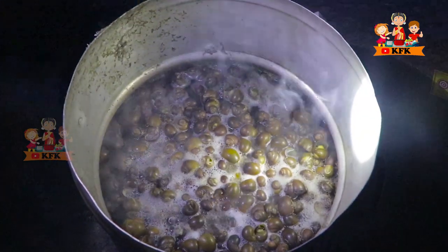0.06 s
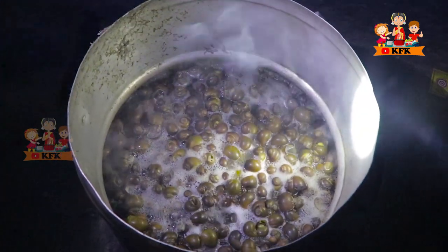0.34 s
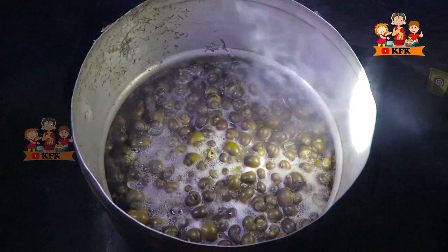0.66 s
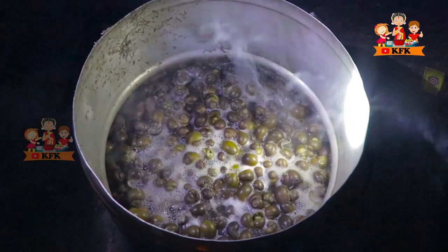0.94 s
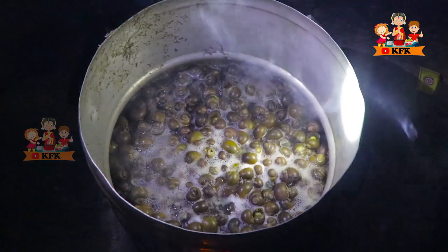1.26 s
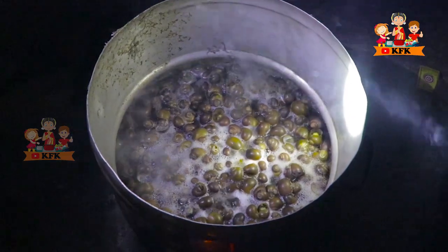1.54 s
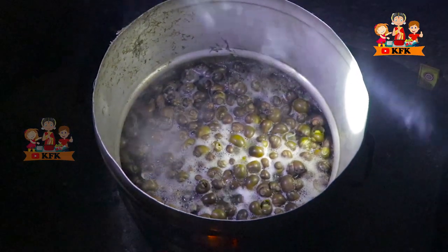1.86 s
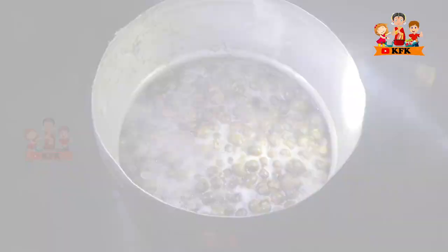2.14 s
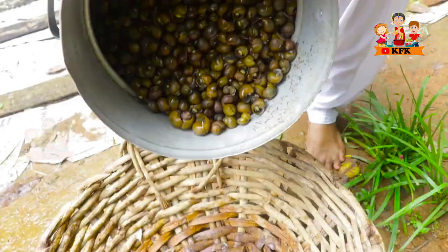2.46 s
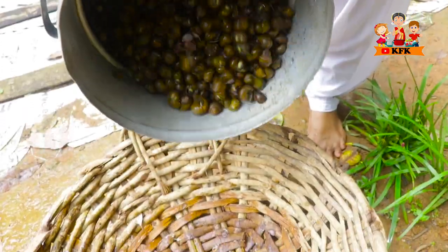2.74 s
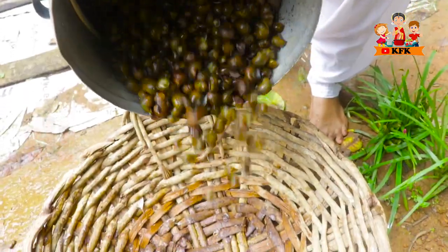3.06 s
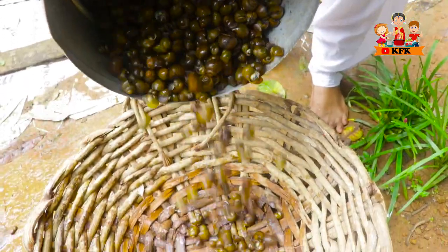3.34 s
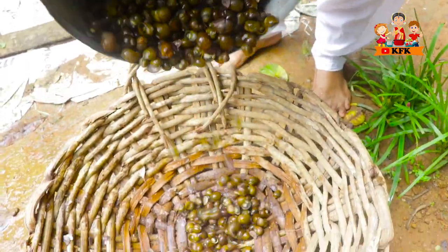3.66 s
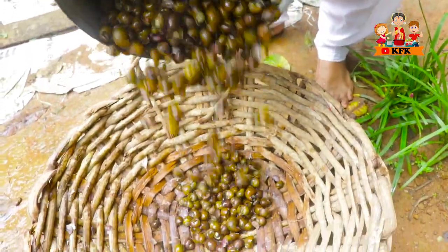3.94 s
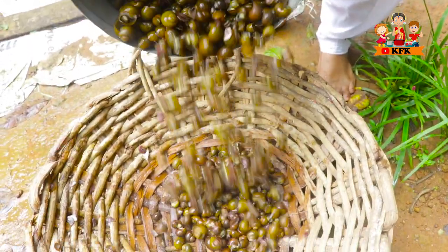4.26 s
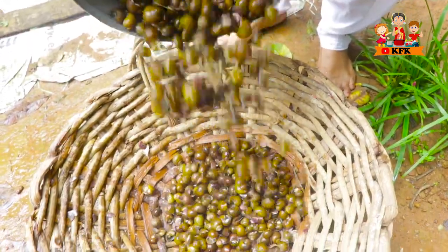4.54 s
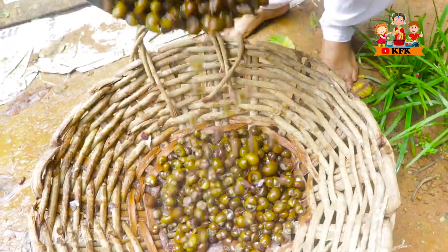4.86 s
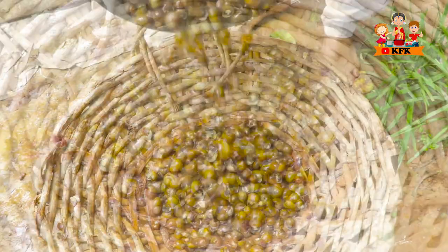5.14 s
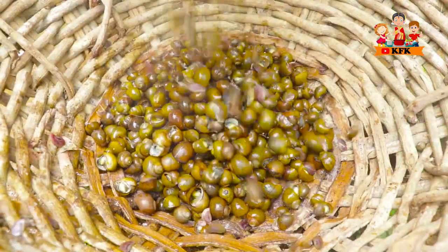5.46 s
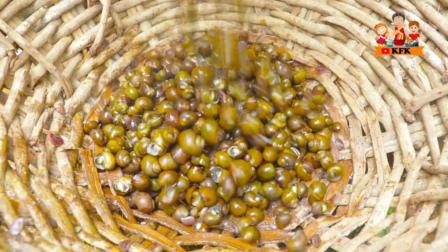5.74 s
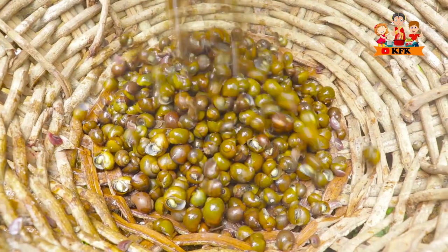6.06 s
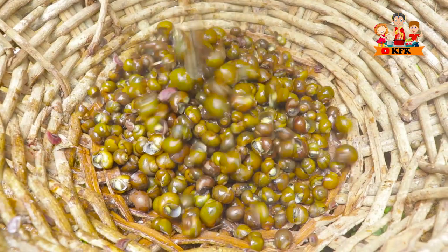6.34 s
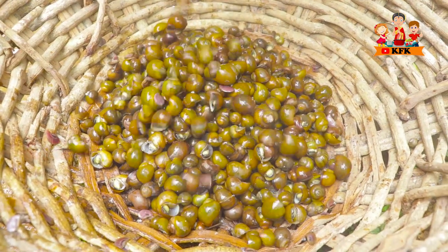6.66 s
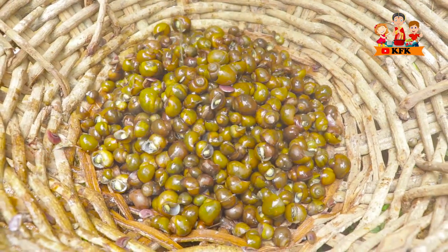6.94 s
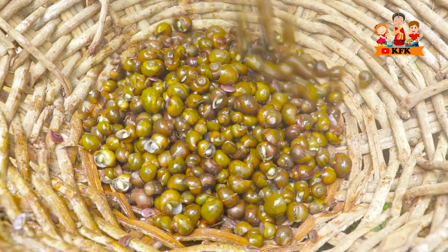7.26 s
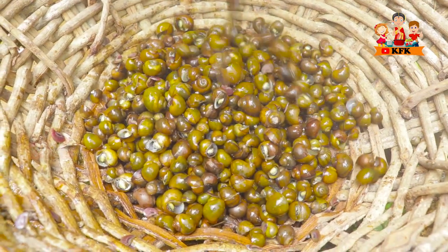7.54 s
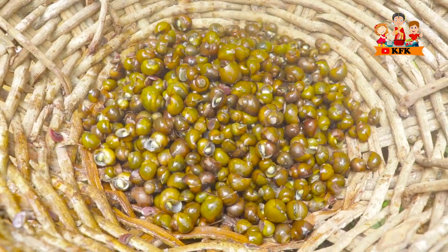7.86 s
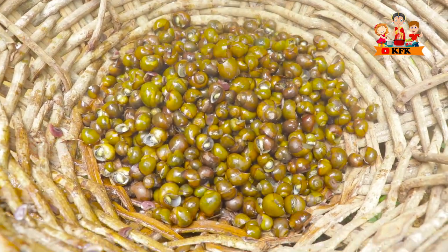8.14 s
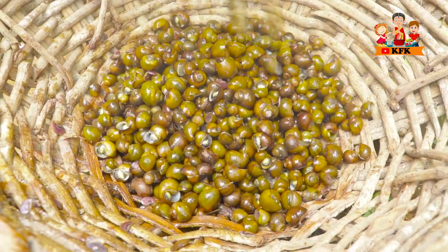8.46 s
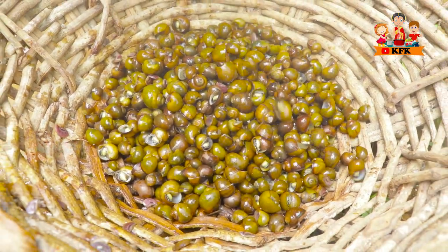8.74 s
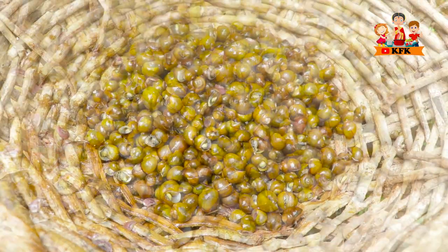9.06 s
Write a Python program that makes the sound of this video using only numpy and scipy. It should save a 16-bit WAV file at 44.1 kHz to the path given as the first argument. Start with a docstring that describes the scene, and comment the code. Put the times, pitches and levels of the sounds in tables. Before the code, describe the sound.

Snails bubble in a ringing metal pot, then wet shells slide out and clatter into a wicker basket outdoors.

```python
"""Snails simmer in a big metal pot: dense bubbles keep the pot ringing over the burner's low hum.
At about 2.4 s the boil gives way to a brief low drone and the outdoors, where insects shrill behind.
The pot is tipped over a woven basket: the load slips with a bright rasp, then wet shells grind over
the metal in surges, thud on the wicker and click on the growing heap. The emptying pot rings more
freely, and the last few shells drop singly."""
import sys
import numpy as np
from scipy import signal
from scipy.io import wavfile
from scipy.ndimage import uniform_filter1d

SR = 44100
rng = np.random.default_rng(int(sys.argv[2]) if len(sys.argv) > 2 else 0)


def output_pcm(signal):
    """Save a mono or channel-first signal as 16-bit PCM at the path in sys.argv[1].

    Samples are clipped to [-1, 1] before scaling.
    """
    pcm = np.clip(np.atleast_2d(signal).T, -1, 1) * 32767
    wavfile.write(sys.argv[1], SR, np.round(pcm).astype(np.int16))


N = 405279

# EQ of the air bed: f/Hz, gain/dB
AIR_EQ = [(25, -27), (200, -10), (700, -13), (3500, -22), (6200, -14.5), (9000, -22), (16000, -33)]
# shrill insect bands: f/Hz, width/Hz, relative level/dB
INSECT_BANDS = [(4716, 16, -66), (5012, 16, -71), (7450, 330, -55)]
# the insects fade in as we move outdoors: t/s, linear gain
INSECT_FADE = [(2.25, 0), (2.55, 0.73)]
# a low tone sags and recovers: t/s, f/Hz, level/dB
DRONE_TONE = [(2.22, 190, -70), (2.3, 175.5, -59), (2.43, 160.6, -52), (2.61, 160.5, -50.5),
              (2.83, 172.6, -67), (2.92, 180, -77)]
# a faint far tone rises: t/s, f/Hz, level/dB
FAR_TONE = [(7.25, 455, -66), (7.29, 470, -51), (7.34, 513, -52), (7.385, 575, -54), (7.45, 555, -62)]

# burner and pot hum together: f/Hz, level/dB at the height of the boil
BURNER_PARTIALS = [(102, -70), (414, -52), (614, -57), (712, -55), (828, -55)]
# the main hum comes and goes: t/s, f/Hz, level/dB
MAIN_HUM = [(0, 204, -72), (0.66, 204.2, -61), (0.74, 203, -50), (0.83, 205, -74), (0.94, 207.4, -50),
            (1.26, 204, -51), (1.35, 206.5, -81), (1.5, 201, -58), (2.28, 202.7, -60.5)]
# envelope of the boil: t/s, relative level/dB
BOIL_LEVEL = [(0, -32.3), (0.7, -31), (2.26, -32), (2.34, -38), (2.42, -53), (2.56, -57)]
# EQ of the bubbling water: f/Hz, gain/dB
BOIL_EQ = [(59, -61), (100, -42), (202, -10.5), (255, -16), (315, -10), (558, -10), (705, -8), (752, -8.5),
           (1150, -4), (2520, -2.5), (4670, -16.5), (6020, -12.5), (6560, -18), (11200, -25),
           (16000, -35.5)]
# modes of the full pot: f/Hz, width/Hz, relative gain/dB
FULL_POT_MODES = [(321, 16, 11), (516, 12, 12), (614, 8, 12), (712, 9, 15), (828, 9, 15), (937, 14, 6),
                  (1034, 18, 9), (1185, 16, 12), (1346, 14, 9), (1464, 26, 10), (1583, 30, 10),
                  (1923, 16, 8), (2030, 14, 4), (2184, 22, 5), (2478, 15, 7), (3600, 270, 0),
                  (5880, 110, 3), (6040, 150, 2)]
# water wells up between the shells after a short lull: t/s, boost/dB, bubble f/Hz
UPWELLINGS = [(0.01, 4.5, 1560), (0.115, 2.5, 2100), (0.26, 1, 1100), (0.595, 4, 1400), (0.85, 0, 1450),
              (1.575, 3.5, 1500), (1.82, 2, 1542)]
# one pot mode firms into a clear tone as the boil goes on: t/s, f/Hz, level/dB
SINGING_MODE = [(0.5, 2478, -60), (1.0, 2478, -49), (1.85, 2478, -47), (2.1, 2478, -60)]

# the steady stream over the rim, in relative levels: t/s, landing level/dB, sliding level/dB
STEADY_FLOW = [(2.5, -62.5, -63), (2.59, -44, -38), (2.76, -41.5, -33.5), (2.89, -42.5, -36.5),
               (4.91, -42, -36), (5.53, -40.5, -36), (6.29, -39, -39), (6.58, -40, -41), (6.78, -81, -44.5),
               (6.99, -63, -27), (7.13, -42.5, -34), (7.48, -36.5, -35.5), (7.72, -54, -61.5),
               (7.96, -77.5, -37.5), (8.1, -69, -48), (8.33, -57, -36), (8.52, -48, -44),
               (8.62, -54.5, -51.5), (8.83, -65.5, -50.5), (9.15, -86, -70)]
# shells jam at the rim, then rush out, in relative levels:
# crest t/s, rise/s, hold/s, jam dip/dB, sliding level/dB, landing level/dB, wicker level/dB
RIM_SURGES = [(3.016, .02, 0.049, 3.5, -39, -40, -67), (3.266, .01, 0.11, 0.5, -31.5, -65, -65),
              (3.397, 0.0099, 0.13, -6, -32, -40, -56), (3.581, .005, 0.016, 5, -31.5, -36, -54),
              (3.777, 0.17, 0.063, -4, -26.5, -40.5, -48), (3.941, 0.004, 0.057, 7.5, -25.5, -36.5, -48),
              (4.144, 0.039, 0.032, 2.5, -25, -36, -52), (4.334, 0.052, 0.024, 2, -31.5, -33.5, -76),
              (4.51, 0.26, 0.069, 6.5, -31.5, -38, -53), (4.723, 0.008, 0.0083, 1, -31, -32.5, -69),
              (4.785, 0.026, 0.021, 6, -52, -37.5, -65), (5.142, 0.0056, 0.0047, -9, -19.5, -30, -61),
              (5.207, .02, 0.018, 5, -31, -32.5, -41.5), (5.835, .015, 0.036, -1.5, -32, -46, -68),
              (6.655, 0.019, 0.05, 1, -38.5, -41, -76), (6.789, 0.009, 0.0065, -2, -36.5, -41.5, -70),
              (6.972, 0.082, 0.069, 20, -24, -39.5, -49), (7.07, 0.016, 0.19, 0, -29, -44, -50),
              (7.286, 0.018, 0.041, 13, -37, -36.5, -50.5), (7.498, 0.05, 0.09, 6, -41.5, -41, -56),
              (7.908, 0.0095, 0.005, 1, -33.5, -49, -60), (7.946, 0.0062, 0.007, 2, -32.5, -45, -65),
              (8.074, 0.053, 0.023, 20, -26, -41, -53.5), (8.138, 0.022, 0.034, 0, -30.5, -43.5, -50.5),
              (8.237, 0.043, 0.014, 15, -28, -42, -47), (8.407, 0.0033, 0.0046, 9.5, -34, -33, -44)]
# the stream breaks off for a moment: t/s, depth/dB
STREAM_PAUSES = [(3.165, 3.5), (3.568, 7), (3.648, 17), (3.705, 4), (4.648, 8), (4.695, 3.5), (5.066, 17),
                 (5.172, 11), (6.225, 8), (6.84, 7), (8.213, 9.5), (8.618, 10)]
# a batch lands and the basket booms: t/s, hold/s, level/dB, f/Hz
BASKET_BOOMS = [(3.733, 0.068, -47.5, 298), (3.93, 0.057, -49, 288), (4.508, 0.066, -55, 293),
                (4.846, 0.015, -40.5, 794), (4.968, 0.0097, -51, 132), (5.147, 0.014, -45, 357),
                (6.941, .08, -54, 340), (7.22, 0.026, -55, 340), (8.807, 0.02, -57, 825)]
# EQ of the thuds on the wicker: f/Hz, gain/dB
WICKER_EQ = [(76, -49.5), (130, -16), (257, -20), (300, 0), (356, -6), (433, -5.5), (550, -4), (729, -8),
             (1000, 11.5), (1300, -27), (2200, -120)]
# the whole load first slips down the wet wall: t/s, relative level/dB
SLIP_LEVEL = [(2.6, -42), (2.726, -38), (2.794, -33.5), (2.885, -30), (2.94, -36.5), (3.1, -31.5),
              (3.135, -36), (3.3, -37.5)]
# bright modes of the pot wall during the slip: f/Hz, width/Hz, relative gain/dB
WALL_MODES = [(2990, 35, 12), (3620, 160, 0), (3700, 1900, -3), (4360, 80, 2), (4485, 70, 4),
              (5085, 45, 3.5)]
# EQ of shells sliding on metal: f/Hz, gain/dB
SLIDE_EQ = [(290, -76), (500, -23), (1220, -3), (1590, -3.5), (1820, -6), (2530, 2.5), (3130, 1),
            (5800, -10), (7000, -1), (9100, -33), (15400, -120)]
# modes of the tipped pot: f/Hz, width/Hz, loaded gain/dB, nearly empty gain/dB
TIPPED_POT_MODES = [(794, 14, 1, 9), (1230, 70, -7.5, 1), (1471, 50, 3.5, -9), (1880, 130, -9, 12),
                    (2090, 40, -12, 3), (2360, 50, -11, 2), (2730, 40, -10, -1), (3100, 110, -13, 6),
                    (3540, 70, 4, 2), (4350, 110, 2, 3), (4740, 50, -8, 5)]
# the load leaves the pot: t/s, share poured out
POURED_SHARE = [(4, 0.027), (5.5, 0.36), (7, 1)]
# EQ of shells landing on shells: f/Hz, gain/dB
HEAP_EQ = [(530, -39), (900, -32), (1090, -47), (1260, -22), (1390, -18), (2140, -7), (3000, -1.5),
           (4920, -4.5), (7400, -0.5), (10900, -5), (16000, -17.5)]
# single shells hit hard, in relative levels: t/s, click level/dB, shell f/Hz, knock level/dB
SHELL_HITS = [(2.63, -6.5, 9070, -35), (2.6454, -11, 5900, -29), (2.6546, -6, 6230, -33),
              (2.671, -15, 6450, -33), (2.6933, -7.5, 7500, -30), (2.8055, -7, 3160, -25),
              (2.8195, -9, 3760, -40), (2.873, -6.5, 4550, -29), (2.885, -8, 5200, -39),
              (2.904, -8, 4550, -48), (3.0579, -17, 2900, -39), (3.0707, -13, 3015, -45),
              (3.0906, -14, 3080, -46), (3.2382, -11, 2802, -25), (3.281, -13, 1990, -26),
              (3.291, -14, 2080, -22.5), (3.3134, -11.5, 3900, -30), (3.3317, -11, 2020, -23.5),
              (3.3832, -18, 3447, -23.5), (3.4202, -10, 7050, -29), (3.437, -15, 9100, -31),
              (3.491, -16.5, 3500, -24.5), (3.516, -17, 3367, -26), (3.5513, -9, 6300, -34),
              (3.6066, -17, 3700, -35), (3.6354, -15, 5300, -27), (3.656, -13, 3340, -31),
              (3.6658, -14, 5030, -39), (3.681, -9, 3800, -28), (3.717, -10.5, 3330, -25),
              (3.854, -12.5, 3670, -41), (3.8753, -15, 6780, -41), (3.9548, -11.5, 1980, -21),
              (3.9777, -4, 3220, -23), (4.0697, -14, 3160, -44), (4.0913, -15.5, 6300, -44),
              (4.1556, -16, 4450, -24), (4.2502, -9, 2340, -33), (4.457, -9.5, 7200, -44),
              (4.491, -11, 3640, -42), (4.6625, -16, 6040, -33), (4.7162, -11, 3020, -37),
              (4.851, -13, 7100, -26.5), (4.965, 0.5, 9100, -26.5), (5.007, -2, 10000, -30.5),
              (5.0462, -8, 4250, -36), (5.084, -4.5, 9700, -34), (5.112, -15, 2670, -37),
              (5.1512, -15, 3600, -26), (5.186, -15, 2724, -31), (5.227, -9, 2700, -33),
              (5.2647, -6, 7280, -34), (5.274, -6.5, 5900, -47), (5.297, -9, 8620, -51),
              (5.3336, -6, 5490, -49), (5.381, -10, 7560, -33), (5.4262, -11, 6850, -48),
              (5.4604, -10, 6560, -36), (5.4799, -8, 7380, -37), (5.5723, -8, 4200, -35),
              (5.613, -19, 2936, -28.5), (5.759, -10, 6210, -35), (5.932, -8.5, 2592, -53),
              (6.0427, -13, 7520, -47), (6.1378, -8, 3600, -39), (6.152, -15, 5000, -46),
              (6.187, -13, 6200, -34), (6.2028, -6, 3720, -30), (6.3093, -6, 10100, -41),
              (6.398, -10, 3300, -34), (6.5007, -8, 4080, -30.5), (6.5682, -10, 3170, -33),
              (6.6465, -9.5, 4020, -35), (6.6606, -9, 1540, -46), (6.7466, -11.5, 5200, -40.5),
              (6.7795, -18, 3630, -45), (6.8678, -19.5, 2380, -40), (6.9636, -8, 1900, -26),
              (7.08, -12, 3110, -38), (7.219, -9.5, 2697, -36), (7.291, -14, 2680, -36),
              (7.5743, -11.5, 9300, -43), (7.6139, -14, 2510, -48), (7.6747, -16, 8600, -38),
              (7.776, -30, 5450, -47), (7.7922, -11, 5400, -37), (8.253, -8, 2940, -24),
              (8.297, -14.5, 3200, -34.5), (8.4063, -11.5, 2410, -30), (8.4164, -5.5, 7570, -46),
              (8.435, -22, 10700, -52), (8.4526, -15, 10600, -44), (8.4747, -16, 2660, -49),
              (8.5322, -7.5, 6360, -37), (8.5695, -13.5, 5240, -42), (8.5817, -12, 6250, -33.5),
              (8.5856, -19, 7540, -45), (8.6418, -19, 7000, -46), (8.661, -14, 8200, -57),
              (8.7397, -23.5, 3000, -45), (8.8005, -16, 5470, -50), (8.8103, -16, 8600, -52),
              (8.844, -24, 4970, -53), (8.8896, -27, 7300, -56), (8.902, -30, 8500, -62),
              (8.922, -17.5, 6400, -51), (8.961, -31, 6940, -67)]


def from_db(db):
    """Decibels to linear gain."""
    return 10 ** (np.asarray(db) / 20)


def rms_one(x):
    """Normalise to an RMS of 1."""
    return x / np.sqrt(np.mean(x ** 2) + 1e-20)


def levelled(x, size=4000):
    """Slow gain riding toward level 1 that leaves transients intact."""
    power = uniform_filter1d(uniform_filter1d(np.mean(x, axis=0) ** 2, size), size // 2)
    return x / np.sqrt(np.abs(power) + 1e-3 * np.mean(x ** 2))


def automation(rows):
    """Each column of a breakpoint curve, sample by sample."""
    times, *columns = np.transpose(rows)
    return [np.interp(np.arange(N) / SR, times, column) for column in columns]


def gate(rows):
    """Open while a curve lasts, with 20 ms fades."""
    t = np.arange(N) / SR
    return uniform_filter1d(1. * ((t >= rows[0][0]) & (t <= rows[-1][0])), 900)


def bumps(t, times, heights_db, width_s):
    """Brief peaks in dB, for boosting or ducking a level."""
    return np.max([db / (1 + ((t - s) / width_s) ** 2) for s, db in zip(times, heights_db)], axis=0)


def drift(rate_hz):
    """Random LFO that glides between values of spread 1."""
    knots = rng.standard_normal(2000)
    return np.interp(np.arange(N) / SR * rate_hz, np.arange(len(knots)), knots)


def pan(left_db):
    """Left and right gains, left_db apart."""
    return from_db(np.array([left_db, -left_db]) / 2).reshape(2, -1)


def stereo_noise(width):
    """White noise with a share of side signal."""
    mid, side = rng.standard_normal((2, N))
    return mid + width * side * np.array([[1], [-1]])


def mono_bass(x, below_hz):
    """Roll the side signal off, so both ears hear the bass alike."""
    mid = x.mean(axis=0)
    return mid + signal.sosfilt(signal.butter(1, below_hz, "high", fs=SR, output="sos"), x - mid)


def band(x, low_hz, high_hz):
    """Butterworth band-pass."""
    sos = signal.butter(2, [low_hz, min(high_hz, SR * .45)], "band", fs=SR, output="sos")
    return signal.sosfilt(sos, x + 1e-18)


def equalised(x, curve, size=4096):
    """Minimum-phase EQ: no pre-ring ahead of a click."""
    hz, db = np.transpose(curve)
    grid_hz = np.abs(np.fft.fftfreq(size, 1 / SR)) + 1
    log_gain = np.log(from_db(np.interp(np.log(grid_hz), np.log(hz), db)))
    response = np.fft.ifft(np.exp(np.conj(signal.hilbert(log_gain)))).real
    return signal.oaconvolve(x, response[None, :size // 2], axes=1)[:, :N]


def resonance(x, hz, width_hz):
    """Two-pole resonator with unity gain at its peak."""
    r = np.exp(-np.pi * width_hz / SR)
    poles = [1, -2 * r * np.cos(2 * np.pi * hz / SR), r * r]
    return signal.lfilter(np.array([1, 0, -1]) * (1 - r * r) / 2, poles, x + 1e-18)


def ringing(x, modes):
    """The ring that a sound excites in a bank of modes."""
    return sum(from_db(db) * resonance(x, hz, width) for hz, width, db in modes)


def gliding_tone(rows, waver_db=2, wobble=.0025):
    """A sine that follows a pitch and level curve and wavers a little in both."""
    hz, db = automation(rows)
    phase = 2 * np.pi * np.cumsum(hz * (1 + wobble * drift(70))) / SR
    return np.sqrt(2) * from_db(db + waver_db * drift(40)) * np.sin(phase) * gate(rows)


def pings(hz, cycles, octaves, phase_spread, size, modes=3):
    """One short ring per contact: damped modes scattered round its pitch, phased apart at each ear."""
    draws = rng.standard_normal((len(hz), modes, 3)).astype(np.float32)
    t = np.arange(size, dtype=np.float32) / SR
    out = np.zeros((2, len(hz), size), np.float32)
    for detune, polarity, phase in draws.transpose(1, 2, 0)[..., None]:
        mode_hz = np.minimum(hz[:, None] * 2 ** (octaves * detune), SR * .45).astype(np.float32)
        age = t * mode_hz * float(2 * np.log(1000) / cycles)
        envelope = np.sign(polarity) * age * np.exp(-age)   # wet contacts build up softly
        for ear, sign in enumerate((1, -1)):
            out[ear] += envelope * np.sin(2 * np.pi * mode_hz * t + sign * phase_spread * phase)
    return out


def placed(times, grains):
    """Lay short stereo grains on the timeline."""
    at = (np.asarray(times) * SR).astype(int)[:, None] + np.arange(grains.shape[2])
    return np.array([np.bincount(at.ravel(), ear.ravel(), N)[:N] for ear in grains])


def shower(curve, low_hz, high_hz, count, cycles, accent_db, pan_db, phase_spread, size, octaves=.568):
    """A cloud of pings while a curve lasts, each with its own time, pitch, strength and pan."""
    when, pitch, accent, where = rng.random((count, 4)).T
    times = curve[0][0] + when * (curve[-1][0] - curve[0][0])
    hz = low_hz * (high_hz / low_hz) ** pitch
    strength = from_db(accent_db * np.minimum(-np.log(1 - accent), 3.3)) * np.sqrt(hz / low_hz)
    gains = strength * pan(pan_db * (2 * where - 1))
    return placed(times, pings(hz, cycles, octaves, phase_spread, size) * gains[..., None])


def crunch(grit, hz, width_hz, decay_s, crack=0):
    """An impact: a crack and a dying burst of tiny contacts in a resonance, at unit energy per ear."""
    age = np.arange(grit.shape[1]) / SR / decay_s
    burst = resonance(grit * np.exp(-age) + crack * (age == 0), hz, width_hz)
    return burst / np.sqrt(np.sum(burst ** 2) / 2)


def with_reflections(x, t60_s, wet_db, top_loss_db):
    """Pot, wicker and ground scatter each contact into a diffuse tail, built from five noise bands."""
    feedback = from_db(-120 / (t60_s * SR))
    edges = np.geomspace(250, 16000, 6)
    noise, mid, tail = rng.standard_normal((2, 2, N)), x.mean(axis=0), 0
    for k, (low, high) in enumerate(zip(edges, edges[1:])):
        power = signal.lfilter([1 - feedback], [1, -feedback], band(mid, low, high) ** 2)
        damping = from_db(-top_loss_db * (high / edges[-1]) ** 2)
        tail = tail + damping * np.sqrt(power) * rms_one(band(noise[k % 2], low, high))
    return x + from_db(wet_db) * tail


def air():
    """A quiet bed of air and low rumble throughout."""
    hiss = from_db(-63) * rms_one(equalised(stereo_noise(width=.5), AIR_EQ))
    rumble = from_db(-79 + 2 * drift(4.2)) * rms_one(resonance(stereo_noise(width=.39), 50, 70))
    return hiss + rumble


def insects():
    """Narrow noise bands shrill steadily once we are outdoors."""
    fade, = automation(INSECT_FADE)
    chorus = 0
    for hz, width, db in INSECT_BANDS:
        shrill = resonance(stereo_noise(width=.83), hz, 2 * width)
        chorus = chorus + from_db(db + 2.5) * rms_one(resonance(shrill, hz, 2 * width))
    return fade * chorus


def low_drone():
    """A low tone comes and goes in a dull rumble with a faint overtone."""
    _, level_db = automation(DRONE_TONE)
    noise = stereo_noise(width=.34)
    rumble = from_db(-1.5) * rms_one(band(noise, 45, 660))
    overtone = from_db(-4.5) * rms_one(resonance(noise, 308, 32))
    return gliding_tone(DRONE_TONE) + (rumble + overtone) * from_db(level_db) * gate(DRONE_TONE)


def burner():
    """The flame rumbles, and burner and pot hum together in wavering partials."""
    boil_db, = automation(BOIL_LEVEL)
    hum = 0
    for hz, db in BURNER_PARTIALS:
        gain = np.sqrt(2) * from_db(db + 3 * drift(24.64) + boil_db - boil_db.max())
        hum = hum + gain * np.sin(2 * np.pi * np.cumsum(hz * (1 + .00838 * drift(12))) / SR)
    flame = from_db(-69) * rms_one(band(stereo_noise(width=.42), 53, 180))
    return (hum + flame) * gate(BOIL_LEVEL) + gliding_tone(MAIN_HUM)


def boil(lull_lead_s=.073, welling_width_s=.011):
    """Bubbles burst between the shells over a seething wash and keep the pot ringing."""
    t = np.arange(N) / SR
    level_db, = automation(BOIL_LEVEL)
    bubbles = shower(BOIL_LEVEL, 245.5, 15170, count=1600, cycles=14.3, accent_db=-1.5,
                     pan_db=0, phase_spread=.18, size=400)
    wash = from_db(10.5) * stereo_noise(width=.83)
    water = mono_bass(equalised(levelled(bubbles) + wash, BOIL_EQ), below_hz=480)
    pot = levelled(water + from_db(-4.5) * ringing(water, FULL_POT_MODES))
    lull_db = bumps(t, [row[0] - lull_lead_s for row in UPWELLINGS], [2] * len(UPWELLINGS), welling_width_s)
    pot *= from_db(level_db + .8 + .5 * drift(23.86) - lull_db)
    pot += sum((from_db(bumps(t, [s], [db], welling_width_s)) - 1) * resonance(pot, hz, hz)
               for s, db, hz in UPWELLINGS)
    pot[1] = np.roll(pot[1], 4)   # the right ear hears it a little later
    return pot * pan(-1) * gate(BOIL_LEVEL) + gliding_tone(SINGING_MODE)


def stream_levels(jam_lead_s=.032, gap_lead_s=.005, surge_t60_s=.23, cushion_db_per_s=1.3):
    """Sliding, landing and wicker levels in dB: a steady flow of shells that jams and then surges."""
    t = np.arange(0, N, 20) / SR
    flow_s, *columns = np.transpose(STEADY_FLOW)
    landing_db, sliding_db = (np.interp(t, flow_s, column) for column in columns)
    wicker_db = sliding_db - 12 - cushion_db_per_s * (t - flow_s[0])   # the heap covers the wicker
    surge_s, _, _, dip_db, *_ = np.transpose(RIM_SURGES)
    jam_db = bumps(t, surge_s - jam_lead_s, dip_db, width_s=.093)
    power = from_db(np.array([sliding_db + .5, landing_db + 2.5, wicker_db]) - jam_db) ** 2
    for crest, rise, hold, _, *levels_db in RIM_SURGES:
        attack = np.clip(1 + (t - crest) / rise, 0, 1) ** 2
        release = from_db(-60 * np.clip((t - crest - hold) / surge_t60_s, 0, 2))
        power += (from_db(levels_db)[:, None] * attack * release) ** 2
    # a shell that hits hard falls through a short gap in the stream
    gap_db = bumps(t, [row[0] - gap_lead_s for row in SHELL_HITS], [6] * len(SHELL_HITS), width_s=.005)
    pause_db = bumps(t, *np.transpose(STREAM_PAUSES), width_s=.011)
    ducked_db = 10 * np.log10(power) - np.maximum(gap_db, pause_db)
    return automation(np.column_stack([t, *ducked_db]))


def basket_booms(width_hz=110, attack_s=.003, t60_s=.1):
    """Batches land one after another and set the hollow basket booming."""
    t, out = np.arange(N) / SR, 0
    pelting = stereo_noise(width=.2)
    for start, hold, db, hz in BASKET_BOOMS:
        release = from_db(-60 * np.clip((t - start - hold) / t60_s, 0, 2))
        push = np.clip((t - start) / attack_s, 0, 1) * release
        boom = resonance(resonance(push * pelting, hz, width_hz), hz, 2 * width_hz)
        out = out + from_db(db) * boom * np.sqrt(np.mean(push ** 2) / np.mean(boom ** 2))
    return out


def wicker_thuds(level_db):
    """Shells pelt the woven basket with dull, quickly damped thuds."""
    thuds = shower(STEADY_FLOW, 250, 1080, count=900, cycles=6.7, accent_db=.5,
                   pan_db=5, phase_spread=.1, size=600)
    return levelled(equalised(thuds, WICKER_EQ)) * from_db(level_db)


def wall_slip(grinding, ring_db_per_db=.8):
    """The load rasps down the wet wall; the harder it scrapes, the more of it is the wall's ring."""
    level_db, = automation(SLIP_LEVEL)
    ring = from_db(ring_db_per_db * (level_db - level_db.max())) * ringing(grinding, WALL_MODES)
    rasp = from_db(-6) * band(grinding, 2400, 6000)
    return levelled(ring + rasp) * from_db(level_db + 4 + 2 * drift(30)) * gate(SLIP_LEVEL)


def sliding_shells(level_db):
    """Shells slip and grind over the metal; the pot's ring changes as the load leaves it."""
    contacts = shower(STEADY_FLOW, 723, 4500, count=3600, cycles=9.5, accent_db=1,
                      pan_db=4.5, phase_spread=.045, size=220)
    grinding = (levelled(contacts) + from_db(7) * stereo_noise(width=.35)) * from_db(3.6 * drift(90))
    poured, = automation(POURED_SHARE)
    modes = [(hz, width, loaded_db + poured * (empty_db - loaded_db))
             for hz, width, loaded_db, empty_db in TIPPED_POT_MODES]
    scrape = equalised(grinding, SLIDE_EQ)
    return levelled(scrape + ringing(scrape, modes)) * from_db(level_db - .5) + wall_slip(grinding)


def heap_clicks(level_db, snaps_per_s=300, snap_decay_s=.003):
    """Shells land on shells in clumps: pitched clicks and sharp snaps, many small and few large."""
    thinning_db = np.clip(-.2 * (level_db + 44), 0, 4)   # a thin stream breaks up into single ticks
    clumps = from_db((1 + thinning_db) * drift(70))
    clicks = shower(STEADY_FLOW, 1800, 12000, count=3000, cycles=30, accent_db=1.6,
                    pan_db=9, phase_spread=.6, size=220, octaves=.4)
    landings = rng.random(N) < snaps_per_s / SR
    energy = landings * from_db(2.1 * np.minimum(rng.exponential(1, N), 4)) ** 2
    snap_power = signal.lfilter([1], [1, -np.exp(-2 / (snap_decay_s * SR))], energy + 1e-18)
    snaps = rms_one(np.sqrt(snap_power)) * stereo_noise(width=.88)
    clatter = clumps * (.61 * levelled(clicks) + snaps)
    return levelled(equalised(clatter, HEAP_EQ)) * from_db(level_db + 7.5)


def pour():
    """One stream of shells drives the clatter on the heap, the slide in the pot and the wicker thuds."""
    sliding_db, landing_db, wicker_db = stream_levels()
    heap = heap_clicks(landing_db) * pan(-4.5)
    slide = sliding_shells(sliding_db) * pan(-3.4)
    wicker = wicker_thuds(wicker_db) * pan(.36)
    return (heap + slide + wicker) * gate(STEADY_FLOW)


def hard_hits(size=1400):
    """A shell falls free: a dry click with its own brief ring, two bounces and a hollow knock below."""
    times, click_db, shell_hz, knock_db = np.transpose(SHELL_HITS)
    detune, place = rng.standard_normal((len(times), 2)).T
    knock_hz = 1400 * 2 ** (.15 * detune)
    mid, side = rng.standard_normal((len(times), 2, 2, 1, size)).transpose(1, 2, 0, 3, 4)
    click_grit = mid[0] + side[0] * np.array([[.75], [-.75]])
    knock_grit = mid[1] + side[1] * np.array([[.25], [-.25]])
    clicks = np.stack([crunch(grit, hz, .75 * hz, decay_s=.0016 * np.sqrt(6000 / hz), crack=2.6)
                       for grit, hz in zip(click_grit, shell_hz)], axis=1)
    ring = pings(shell_hz, cycles=42, octaves=.03, phase_spread=.4, size=size, modes=1)
    clicks += from_db(-4) * ring / np.sqrt(np.sum(ring ** 2, axis=2, keepdims=True))
    clicks *= (from_db(click_db + 9) * pan(2 * place - 4))[..., None]   # scattered right of centre
    knocks = np.stack([crunch(grit, hz, .57 * hz, decay_s=.0045)
                       for grit, hz in zip(knock_grit, knock_hz)], axis=1)
    knocks *= from_db(knock_db + 21)[:, None]
    bounces = sum(from_db(db) * placed(times + k * rng.uniform(.002, .008, len(times)), clicks)
                  for k, db in enumerate((-11, -16), start=1))
    return band(placed(times, clicks) + bounces, 1700, 12500) + band(placed(times, knocks), 320, 2500)


def scene():
    """The boil, then the pour outdoors; while the load slips, hard hits ring the pot wall too."""
    hits = hard_hits()
    wall_ring = from_db(-10.5) * ringing(hits * gate(SLIP_LEVEL), WALL_MODES)
    shells = with_reflections(pour() + hits + wall_ring, t60_s=.06, wet_db=-9, top_loss_db=5)
    cooking = boil() + burner()
    booms = basket_booms()
    background = low_drone() + gliding_tone(FAR_TONE, waver_db=4, wobble=.012) + air() + insects()
    return background + cooking + booms + shells


def record(dry):
    """Soft clipping rounds the sharpest peaks, then a steep low-pass cuts the top at 16 kHz."""
    rounded = .75 * np.tanh(dry / .75)
    return signal.sosfilt(signal.ellip(10, .1, 80, 16000, fs=SR, output="sos"), rounded)


dry = scene()
out = record(dry)
output_pcm(out)
```